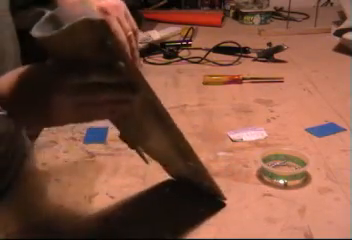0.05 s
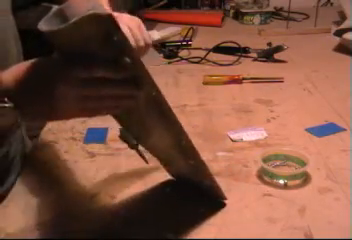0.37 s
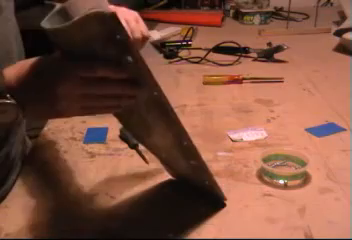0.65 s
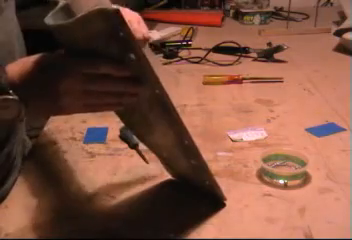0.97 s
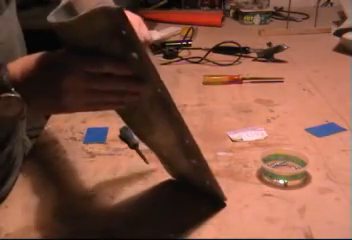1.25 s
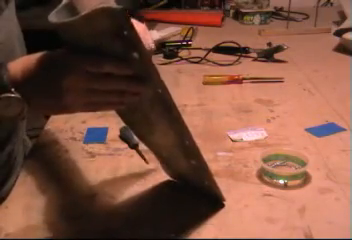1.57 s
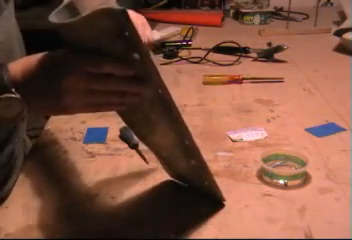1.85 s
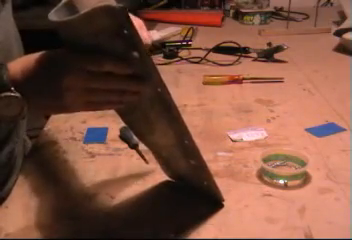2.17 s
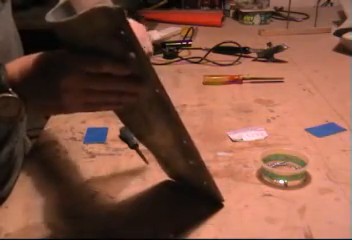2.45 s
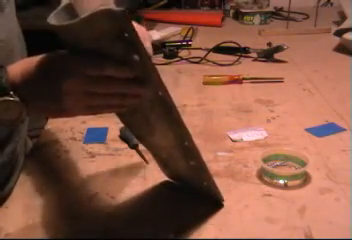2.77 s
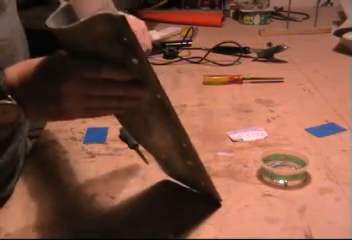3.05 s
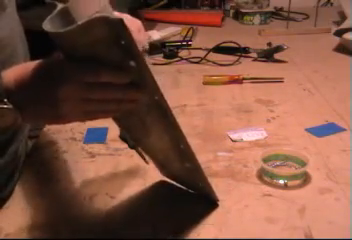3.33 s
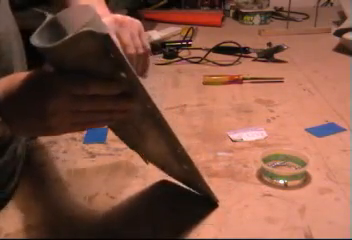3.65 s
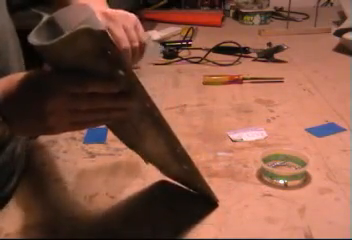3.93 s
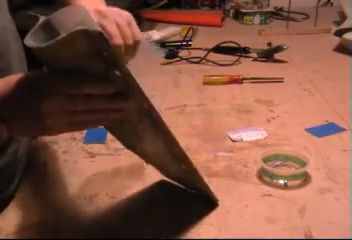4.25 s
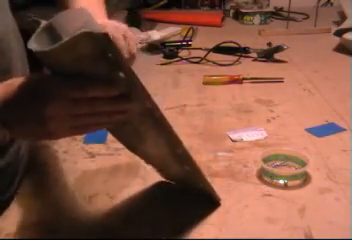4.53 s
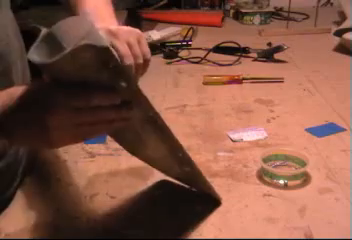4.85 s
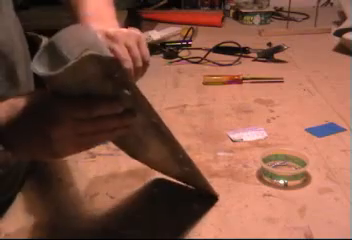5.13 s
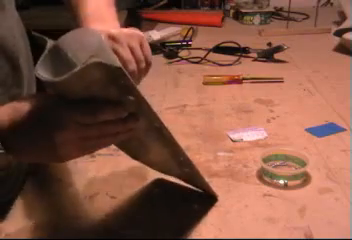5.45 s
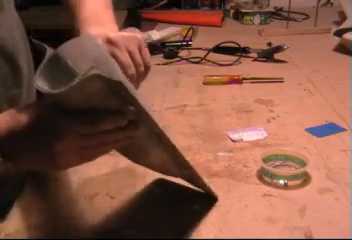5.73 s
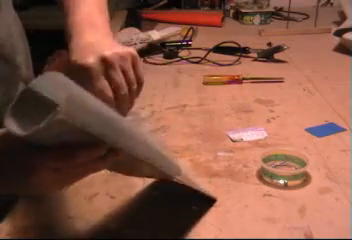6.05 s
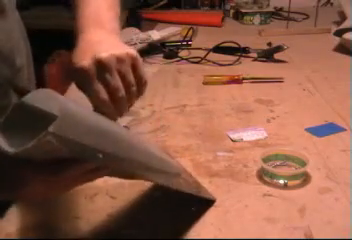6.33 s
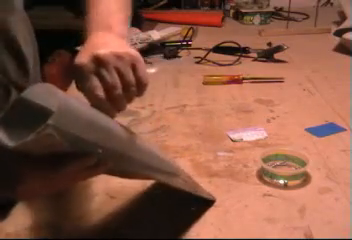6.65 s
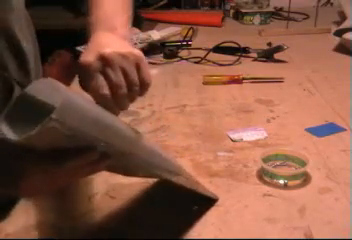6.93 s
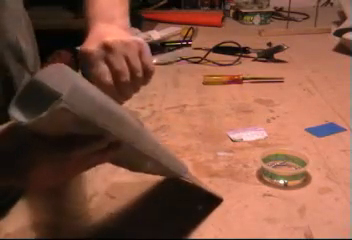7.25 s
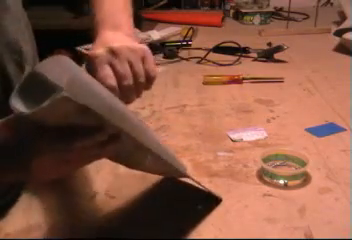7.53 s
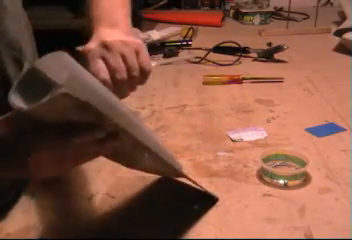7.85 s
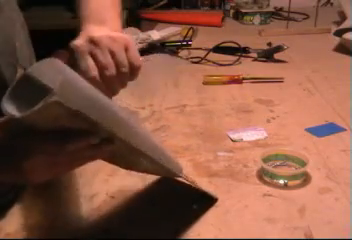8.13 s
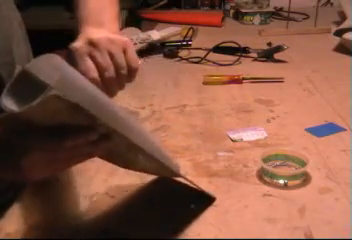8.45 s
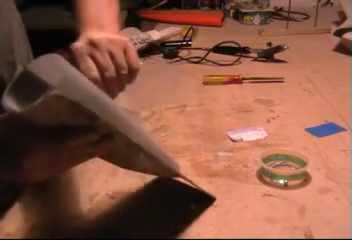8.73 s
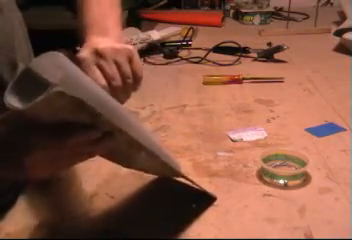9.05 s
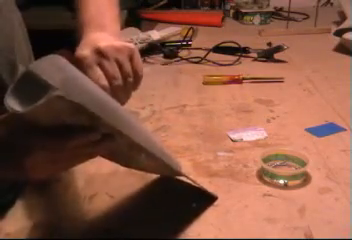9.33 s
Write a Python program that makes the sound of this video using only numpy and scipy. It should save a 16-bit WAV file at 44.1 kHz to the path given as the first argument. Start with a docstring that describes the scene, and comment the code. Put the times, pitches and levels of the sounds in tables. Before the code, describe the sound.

A thin plastic sheet is wiggled between a resin part and its hollow mould, rubbing and scraping in quick strokes with small squeaks. The resin lets go in scattered pops and dry cracks. Midway the mould knocks harder on the bench, followed by one very loud, sharp crack. Scraping and smaller crackles then carry on. The sound is close, in a small, quiet workshop.

```python
"""A small workshop: on the bench, a thin plastic sheet is worked to and fro between a resin part
and its mould. Each push flexes, rubs and scrapes the hollow shell; the sheet squeaks as it sticks
and rasps over the rim, and the mould knocks on the bench. The resin lets go in hollow pops and dry
cracks. A short room reverb and quiet room tone sit behind, and a limiter ducks the loudest peaks."""
import sys
import numpy as np
from scipy import signal
from scipy.fft import rfft, irfft, next_fast_len
from scipy.io import wavfile

SR = 44100
rng = np.random.default_rng(int(sys.argv[2]) if len(sys.argv) > 2 else 0)


def unload_audio(sound):
    """Save the sound as a 16-bit wav file, at the path given as the first command line argument."""
    columns = np.transpose(np.atleast_2d(sound))
    # keep every value between -1 and 1, then stretch to whole-number steps
    steps = np.round(np.clip(columns, -1, 1) * 32767)
    wavfile.write(sys.argv[1], SR, steps.astype(np.int16))


N = 414099

# Levels in the tables are relative; each layer adds its own gain.
# room tone: freq_hz, level_db
ROOM_TONE_EQ = [(25, -7), (60, -20), (120, -2.5), (200, -5.5), (320, -1), (550, -7), (800, -7.5),
                (1600, -11.5), (2700, -13.5), (3600, -22.5), (8000, -19.5), (13500, -29.5), (15500, -33)]
# the workshop's reverb time: freq_hz, t60_s
ROOM_DECAY = [(100, 0.52), (400, 0.32), (1200, 0.28), (4000, 0.245), (8000, 0.235), (15000, 0.21)]
# resonances of the hollow shell: pitch_hz, width_hz, lift_db
SHELL_MODES = [(114, 18, 5.5), (172, 16, 8), (210, 40, -4.5), (258, 30, 3), (308, 50, 7), (400, 30, 3),
               (550, 60, 5), (775, 45, 7), (856, 40, 5), (960, 50, 3), (1130, 90, 2), (1320, 90, 3),
               (1610, 200, 2.5), (2000, 110, 3), (2780, 110, 2), (3060, 90, 3), (3375, 70, 2.5),
               (3800, 70, 2.5), (4040, 90, 1)]

# the mould knocking on the bench: start_s, boom_db, knock_db, wall_pitch_hz
BENCH_KNOCKS = [(0.337, -45, -52, 296), (0.93, -60, -59, 300), (1.21, -52, -51, 300),
                (1.797, -53, -45, 301), (2.0, -41, -41, 290), (2.216, -48, -39.5, 258),
                (2.451, -40, -48, 290), (2.631, -52, -39.5, 258), (2.736, -58, -44, 339),
                (2.806, -41, -26, 172), (2.929, -44, -49, 300), (3.266, -57, -43, 300),
                (3.673, -62, -35.5, 306), (4.08, -34, -28, 220), (4.345, -29, -22, 387),
                (4.541, -31, -22, 305), (4.587, -27.5, -42, 166), (4.809, -19.5, -12.5, 382),
                (4.844, -27, -17.5, 166), (5.134, -31, -28.5, 177), (6.583, -59, -35, 312),
                (7.067, -43, -29.5, 312), (7.279, -46, -34, 296), (7.497, -61, -58, 300),
                (7.773, -60, -50, 290), (8.1, -46, -40.5, 284), (8.586, -33, -35.5, 392),
                (9.196, -54, -27.5, 296), (9.301, -32.5, -34, 274)]
# the bench's low boom and the mould's hollow knock: freq_hz, level_db
BOOM_EQ = [(25, -82), (60, -21), (90, -5), (120, 6), (160, -8.5), (220, -5), (450, -73.5)]
KNOCK_EQ = [(30, -42.5), (120, -15), (200, -5), (290, -7), (410, -5), (580, -12.5), (900, -19.5),
            (3000, -30), (10000, -39.5)]

# bouts of even wiggling: first_stroke_s, last_stroke_s, strokes_per_s, first_db, last_db
WIGGLE_BOUTS = [(0.793, 1.494, 7, -56.5, -55), (1.804, 2.343, 9, -58, -57), (2.65, 2.759, 9, -55, -52.5),
                (2.928, 3.368, 11, -47, -53), (4.988, 5.262, 7.5, -42.5, -51.5),
                (5.686, 5.917, 8, -52.5, -49), (6.45, 7.303, 7, -51, -56.5),
                (7.485, 7.813, 6.5, -48, -57.5), (7.952, 8.581, 6.5, -54, -48.5),
                (8.705, 9.312, 8, -49, -48)]
# single shoves and slow slides: middle_s, length_s, level_db
SINGLE_PUSHES = [(0.362, 0.057, -55), (0.635, 0.18, -62.5), (1.24, 0.0069, -72), (1.591, 0.032, -51.5),
                 (2.03, 0.039, -48), (2.133, 0.037, -49.5), (2.346, 0.019, -51), (2.45, 0.035, -40),
                 (2.543, 0.025, -46), (2.812, 0.02, -38.5), (3.022, 0.022, -37), (3.276, 0.048, -49),
                 (3.712, 0.11, -50), (3.915, 0.096, -61), (4.113, 0.046, -49), (4.255, 0.042, -47.5),
                 (4.356, 0.035, -41), (4.592, 0.06, -33.5), (4.863, 0.055, -34), (5.093, 0.029, -52),
                 (5.474, 0.15, -53), (6.143, 0.086, -53), (6.875, 0.045, -41), (7.037, 0.058, -48),
                 (7.085, 0.012, -44), (7.161, 0.053, -42.5), (7.634, 0.037, -48.5), (9.102, 0.015, -49)]
# flex and edge scrape against the rub, as the grip changes: time_s, flex_db, edge_db
GRIP_BALANCE = [(0.3, -6.5, -1.5), (1.2, 0.5, 1), (1.7, 7.5, 1), (2.5, 2.5, -1.5), (2.8, 1.5, -3.5),
                (3.05, 5, -2), (3.4, 6, 0), (3.7, -5.5, 0), (4.05, 10, 0), (4.6, -12, -1), (4.9, -4, -1),
                (5.15, -3, 0.5), (5.85, 2.5, 2), (6.2, -14.5, 0.5), (6.85, 0, -2.5), (7.35, 3, 1),
                (7.7, -7.5, 2.5), (8.5, -2.5, 1), (9.3, 2.5, -1)]
# the shell's low flex, the face's midrange rub and the edge's bright scrape: freq_hz, level_db
FLEX_EQ = [(25, -23), (60, -26), (90, -0.5), (120, 3), (165, -9), (215, 0), (290, -0.5), (420, -8),
           (600, -21), (1000, -46.5)]
RUB_EQ = [(350, 3.5), (620, 2.5), (800, 2.5), (1100, 1), (1550, 6), (2000, 0.5), (2600, 2), (3500, -12.5),
          (6000, -35)]
SCRAPE_EQ = [(1500, -29.5), (2600, -12), (4000, -10.5), (5700, -11), (8000, -13.5), (12000, -20.5),
             (14200, -27), (15500, -45.5)]
# groans and squeaks of the sticking sheet: middle_s, length_s, pitch_hz, level_db
SHEET_SQUEAKS = [(0.785, 0.0091, 1450, -51), (0.943, 0.03, 1460, -59.5), (1.22, 0.015, 1530, -57),
                 (1.356, 0.03, 1480, -55), (1.591, 0.019, 1530, -46), (2.952, 0.017, 530, -41.5),
                 (4.28, 0.1, 324, -60), (5.186, 0.11, 1320, -52), (6.11, 0.0048, 1950, -44),
                 (6.29, 0.0087, 1980, -53), (6.865, 0.035, 390, -41.5), (6.894, 0.05, 780, -54),
                 (7.16, 0.064, 795, -49), (7.282, 0.0099, 255, -34.5), (7.657, 0.058, 289, -45.5),
                 (7.948, 0.018, 1610, -58), (8.278, 0.017, 1520, -49), (8.37, 0.024, 610, -49.5)]
# the edge catching on the rim: middle_s, length_s, level_db, pitch_hz
RIM_RASPS = [(2.462, 0.0077, -32.5, 11800), (4.083, 0.0092, -49, 2980), (6.202, 0.022, -49, 1960),
             (7.081, 0.0076, -40.5, 9500), (7.63, 0.0095, -44, 2920), (7.675, 0.011, -44, 2600),
             (7.94, 0.013, -53, 1600), (8.285, 0.011, -44.5, 1570), (8.414, 0.0072, -45, 2550),
             (8.552, 0.022, -48, 2570), (8.675, 0.012, -41.5, 2500), (8.815, 0.0072, -40.5, 2030),
             (8.95, 0.0064, -46, 2530), (9.062, 0.017, -48, 1650), (9.275, 0.015, -42.5, 850)]
# the grit of a rasp: freq_hz, level_db
RASP_EQ = [(300, 4), (800, -13), (1600, 6), (2700, -1), (5000, -2.5), (10000, -6.5), (14000, -18),
           (15500, -45)]

# resin springing off the mould: start_s, level_db, patch_pitch_hz, tilt_db_per_octave, tick_db
RESIN_POPS = [(1.4209, -32.5, 930, -1.5, -8.5), (1.6562, -30.5, 960, -1, 0.5),
              (1.8667, -48, 940, -6.5, 0.5), (2.289, -44, 960, -3.5, -10), (2.437, -44.5, 1210, 3, 6),
              (2.4613, -34.5, 1210, 1, 3), (2.863, -32, 910, -1, -0.5), (4.1661, -32, 910, -1.5, -3.5),
              (4.4725, -52, 850, -1.5, 7.5), (4.6413, -30.5, 980, -1, -8), (4.6839, -29, 1500, 0.5, -5.5),
              (7.446, -44.5, 776, -8.5, -13), (8.999, -53.5, 1120, -6, -12)]
# resonances of the springing lip: pitch_hz, width_hz, level_db
LIP_MODES = [(320, 45, -1), (860, 100, 0), (1060, 230, -0.5), (1500, 100, -11), (1760, 140, -5),
             (2300, 160, -6), (2500, 200, 0), (3480, 240, -1), (4450, 260, -4)]
# the tick as the bond parts, and the pop as thrown around the room: freq_hz, level_db
TICK_EQ = [(2000, -50), (4800, -36), (5800, -25), (6900, -16.5), (8200, -22), (10000, -23), (13000, -32),
           (16000, -48)]
POP_SEND_EQ = [(100, -14), (340, -1), (600, -7.5), (880, 1.5), (1250, -4), (1750, -3.5), (2100, -4.5),
               (2800, -5.5), (4500, -8.5), (8000, -17)]

# dry cracks that also jolt the shell: start_s, level_db, patch_pitch_hz, tilt_db_per_octave
RESIN_CRACKS = [(0.0198, -59, 1540, -1), (0.3351, -51.5, 1250, -7), (2.0235, -48.5, 1550, -3),
                (2.787, -46.5, 1470, 1.5), (2.807, -38.5, 1550, -2.5), (3.0147, -36.5, 1420, -1.5),
                (3.1715, -42.5, 750, -1), (3.2624, -47, 1440, -2), (3.673, -47.5, 930, -1),
                (4.538, -27.5, 794, -1), (4.551, -26.5, 1060, -2.5), (5.4449, -9.5, 2940, -0.5),
                (5.6709, -49, 1346, -2), (5.7736, -60.5, 2490, 5), (5.821, -39, 2540, -2.5),
                (6.194, -47.5, 2080, -2), (6.3907, -39.5, 1690, -3.5), (6.582, -44.5, 9250, 1.5),
                (6.972, -64, 4000, 4), (7.0024, -41.5, 3100, -1), (7.0684, -45, 850, -1.5),
                (7.4314, -60, 2580, -1.5), (7.589, -65.5, 2570, 5), (8.06, -53, 1600, 0.5),
                (8.4107, -47.5, 2570, -2), (8.6416, -51, 2440, 0), (8.6767, -51.5, 754, -7),
                (8.7109, -32.5, 1270, 3), (8.913, -71, 5300, 8.5), (8.9462, -43, 2530, -1),
                (9.1562, -56, 4800, 1.5), (9.1949, -36.5, 1630, -1), (9.2793, -45, 840, -4.5)]
# a crack's basic tone, and the presence curve laid over it: freq_hz, level_db
SNAP_EQ = [(30, -36), (55, -23), (120, -26.5), (300, -2), (480, -13), (620, -11), (850, -6.5), (1400, -3.5),
           (3000, -14), (5000, -6), (9000, -2), (13000, -8), (16000, -34)]
PRESENCE_EQ = [(350, -4.5), (1100, -3), (1700, -1), (2900, 5), (4500, -2), (8500, -12.5)]
# the resin plate ringing on after a snap: pitch_hz, width_hz, level_db
PLATE_MODES = [(330, 200, 0), (950, 450, -1), (1550, 450, -4), (2500, 600, -3), (3500, 700, -5),
               (4500, 600, -8)]
# the stiff rim's resonances, which small cracks ring: pitch_hz, width_hz, lift_db
RIM_MODES = [(770, 70, 4), (1630, 150, 3.5), (2580, 300, 3), (4050, 200, 3), (5300, 200, 3)]
# the span over which pops and cracks tilt bright or dull: low_hz, high_hz
TILT_SPAN = (350, 8500)

# depth of the recorder's notch filter: freq_hz, share_cut
RECORDER_NOTCHES = [(380, 0), (580, .55), (2400, .45), (5000, .3), (9000, .1)]


def from_db(db):
    """Decibels to gain."""
    return 10 ** (np.asarray(db) / 20)


def rms_one(x):
    """Scale to rms 1."""
    return x / np.sqrt(np.mean(x ** 2) + 1e-20)


def at_hz(points, hz):
    """Read a curve along log frequency."""
    freqs, values = np.transpose(points)
    return np.interp(np.log(np.maximum(hz, 1)), np.log(freqs), values)


def add(track, start_s, sound):
    """Mix a sound into the track."""
    start = max(round(start_s * SR), 0)
    track[start:start + len(sound)] += sound[:N - start]


def drift(per_s):
    """A wandering random control signal with rms 1."""
    knots = rng.standard_normal(N // 20)
    return rms_one(np.interp(np.arange(N) / SR * per_s, np.arange(len(knots)), knots))


def eq(x, curve):
    """Minimum-phase EQ: nothing rings ahead of an attack."""
    size = 2 * next_fast_len(x.shape[-1] // 2 + 2048)
    log_gain = np.log(from_db(at_hz(curve, np.fft.rfftfreq(size, 1 / SR))))
    causal = np.r_[1, np.full(size // 2 - 1, 2), 1, np.zeros(size // 2 - 1)]
    response = np.exp(rfft(irfft(log_gain) * causal))
    return irfft(rfft(x, size) * response, size)[..., :x.shape[-1]]


def resonance(x, hz, width_hz):
    """A two-pole resonance with gain 1 at its peak."""
    r = np.exp(-np.pi * width_hz / SR)
    poles = [1, -2 * r * np.cos(2 * np.pi * hz / SR), r * r]
    return (1 - r * r) / 2 * signal.lfilter([1, 0, -1], poles, x + 1e-18)


def ring(x, modes):
    """Only the ringing of the modes that x excites."""
    return sum(from_db(db) * resonance(x, hz, width) for hz, width, db in modes)


def lift(x, modes, share=1):
    """Boost or dip x at each mode, by a share of its lift in dB."""
    return x + sum((from_db(share * db) - 1) * resonance(x, hz, width) for hz, width, db in modes)


def burst(t60_s, rise_s, size=6000):
    """A swelling, dying cluster of tiny contacts, even in spectrum, with unit energy."""
    t = np.arange(size) / SR
    fade = np.exp(-np.log(1000) * t / t60_s) * (1 - np.exp(-t / rise_s))
    x = rng.standard_normal(size) * fade
    for _ in range(2):  # flatten the spectrum, then restore the fade
        spectrum = rfft(x)
        x = irfft(spectrum / (np.abs(spectrum) + 1e-12)) * np.sqrt(fade)
    return x / np.sqrt(np.sum(x ** 2))


def friction(curve, slips_per_s, spread_db, hiss, judder_db, judder_per_s):
    """Tiny slips of uneven size over a smooth hiss; the contact grips and lets go."""
    sizes = from_db(spread_db * np.minimum(rng.exponential(1, N), 4)) * rng.choice([-1, 1], N)
    slips = rms_one(sizes * (rng.random(N) < slips_per_s / SR))
    texture = slips + hiss * rng.standard_normal(N)
    grip = from_db(judder_db * np.tanh(drift(judder_per_s)))
    return rms_one(eq(texture * grip, curve))


def push(t, middle_s, length_s):
    """The hand speeds up, then stops: a bell of friction power, length_s wide at half height."""
    return .5 ** np.minimum((2 * (t - middle_s) / length_s) ** 2, 60)


def stereo_noise(size, side):
    """Mid-side noise; more side makes it wider."""
    mid, difference = rng.standard_normal((2, size))
    return mid + side * difference * np.array([[1], [-1]])


def room_tone(level_db):
    """A wide, steady bed of soft air."""
    return from_db(level_db) * rms_one(eq(stereo_noise(N, side=0.97), ROOM_TONE_EQ))


def workshop_reverb(send, wet_db, side, build_s, size=22050):
    """Dense reflections build up and die away band by band; the bass stays narrow and close."""
    t, tail = np.arange(size) / SR, 0
    edges_hz = np.geomspace(60, 17000, 10)
    for low, high in zip(edges_hz, edges_hz[1:]):
        hz = np.sqrt(low * high)
        width = side * hz / (hz + 500) * (1 + (hz / 13000) ** 2)
        band = signal.butter(2, [low, high], "band", fs=SR, output="sos")
        noise = signal.sosfilt(band, stereo_noise(size, width))
        decay = from_db(-60 * t / at_hz(ROOM_DECAY, hz))
        tail += noise * decay * hz / (hz + 120)
    tail = rms_one(tail * (1 - np.exp(-t / build_s))) / np.sqrt(size)
    return from_db(wet_db) * signal.fftconvolve(send[None], tail, axes=1)[:, :N]


def bench_knocks(boom_gain_db, knock_gain_db, wall_lift_db, wall_width_hz):
    """The mould shifts: the bench booms under a short, hollow knock that rings one note of the wall."""
    out = np.zeros(N)
    for start_s, boom_db, knock_db, wall_hz in BENCH_KNOCKS:
        boom = eq(burst(t60_s=0.05, rise_s=0.0048), BOOM_EQ)
        knock = eq(burst(t60_s=0.066, rise_s=0.0018), KNOCK_EQ)
        knock = lift(knock, [(wall_hz, wall_width_hz, wall_lift_db)])
        add(out, start_s, from_db(boom_db + boom_gain_db) * boom)
        add(out, start_s, from_db(knock_db + knock_gain_db) * knock)
    return out


def squeaks(q):
    """Stick and slip feeds one resonance for a moment, giving a rough, wavering note."""
    t, out = np.arange(N) / SR, 0
    for middle_s, length_s, hz, level_db in SHEET_SQUEAKS:
        band = resonance(rng.standard_normal(N), hz, hz / q)
        note = rms_one(resonance(band, hz, hz / q))
        out += from_db(level_db) * np.sqrt(push(t, middle_s, length_s)) * note
    return out


def rim_rasps(lift_db, q):
    """Quick runs of fine slips, each ringing its own spot of the rim."""
    t, out = np.arange(N) / SR, 0
    grit = friction(RASP_EQ, slips_per_s=5000, spread_db=2.5, hiss=.4, judder_db=2, judder_per_s=400)
    for middle_s, length_s, level_db, hz in RIM_RASPS:
        rasp = rms_one(lift(grit, [(hz, hz / q, lift_db)]))
        out += from_db(level_db) * np.sqrt(push(t, middle_s, length_s)) * rasp
    return out


def wiggles(stroke_s):
    """Even strokes at the hand's pace, their force ramping over a bout: middle_s, length_s, level_db."""
    strokes = []
    for first_s, last_s, per_s, first_db, last_db in WIGGLE_BOUTS:
        count = 1 + round((last_s - first_s) * per_s)
        ramp = np.linspace((first_s, first_db), (last_s, last_db), count)
        strokes += [(middle_s, stroke_s, level_db) for middle_s, level_db in ramp]
    return strokes


def wandering_contact(x, modes, swell_db, per_s):
    """The point of contact wanders, so the shell's resonances swell and fade by turns."""
    moving_modes = [(hz, width, swell_db * np.tanh(drift(per_s))) for hz, width, _ in modes]
    return rms_one(lift(x, moving_modes))


def sheet_strokes(flex_gain_db, rub_gain_db, edge_gain_db):
    """One push drives three layers: the shell flexes, the sheet's face rubs and its edge scrapes."""
    t, power = np.arange(0, N, 40) / SR, 0
    usual_db, edge_growth = -52, 0.87  # the scrape grows more slowly with force than the rub
    grip_s, *grip_columns = np.transpose(GRIP_BALANCE)
    for middle_s, length_s, level_db in wiggles(stroke_s=0.046) + SINGLE_PUSHES:
        flex_db, bite_db = [np.interp(middle_s, grip_s, column) for column in grip_columns]
        edge_db = usual_db + bite_db + edge_growth * (level_db - usual_db)
        gains = from_db([[level_db + flex_db], [level_db], [edge_db]])
        power += gains ** 2 * push(t, middle_s, length_s)
    flex_env, rub_env, edge_env = [np.interp(np.arange(N) / SR, t, np.sqrt(p)) for p in power]
    flex = friction(FLEX_EQ, slips_per_s=400, spread_db=1.5, hiss=.7, judder_db=2, judder_per_s=50)
    rub = friction(RUB_EQ, slips_per_s=1800, spread_db=2.5, hiss=.45, judder_db=3, judder_per_s=200)
    edge = friction(SCRAPE_EQ, slips_per_s=2500, spread_db=3.3, hiss=.45, judder_db=3, judder_per_s=200)
    flex = wandering_contact(flex, SHELL_MODES[:7], swell_db=3.5, per_s=8.2)
    rub = wandering_contact(rub, SHELL_MODES[7:15], swell_db=5, per_s=12)
    return (from_db(flex_gain_db) * flex_env * flex
            + from_db(rub_gain_db) * rub_env * rub
            + from_db(edge_gain_db) * edge_env * edge)


def resin_pops(gain_db, patch_lift_db, patch_q, tick_send_db):
    """One clean jolt rings the lip under a bright tick. Returns the direct pop and a duller room send."""
    direct, send = np.zeros((2, N))
    soft_contact = signal.butter(2, 2900, fs=SR, output="sos")
    jolt = signal.sosfilt(soft_contact, signal.unit_impulse(6000))
    for start_s, level_db, patch_hz, tilt, tick_db in RESIN_POPS:
        kick = eq(jolt, [(hz, tilt * np.log2(hz / patch_hz)) for hz in TILT_SPAN])
        kick = lift(kick, [(patch_hz, patch_hz / patch_q, patch_lift_db)])
        tick = from_db(tick_db) * eq(burst(t60_s=0.0077, rise_s=0.0003), TICK_EQ)
        gain = from_db(gain_db + level_db)
        add(direct, start_s, gain * (ring(kick, LIP_MODES) + tick))
        add(send, start_s, gain * (eq(kick, POP_SEND_EQ) + from_db(tick_send_db) * tick))
    return direct, send


def resin_cracks(gain_db, plate_db, patch_lift_db, patch_q, send_db):
    """A snap rings the plate and the freed patch adds its pitch. Returns direct sound and room send."""
    direct, send = np.zeros((2, N))
    lowpass, highpass = [signal.butter(2, 5000, kind, fs=SR, output="sos") for kind in ("low", "high")]
    hz, pivot_hz = np.geomspace(30, 16000, 60), 1800
    octaves = np.log2(np.clip(hz, *TILT_SPAN) / pivot_hz)
    for start_s, level_db, patch_hz, tilt in RESIN_CRACKS:
        run = 1 + 2.4 * from_db(level_db)  # a stronger crack runs further
        body = signal.sosfilt(lowpass, burst(t60_s=0.011 * run, rise_s=0.0026 * run))
        tip = signal.sosfilt(highpass, burst(t60_s=0.012 * run, rise_s=0.00064 * run))
        plate = ring(burst(t60_s=0.04, rise_s=0.00016), PLATE_MODES)
        tone = np.c_[hz, at_hz(SNAP_EQ, hz) + at_hz(PRESENCE_EQ, hz) + tilt * octaves]
        patch = [(patch_hz, patch_hz * run ** 2 / patch_q, patch_lift_db)]  # long cracks ring less purely
        snap = lift(eq(body + tip + from_db(plate_db) * plate, tone), patch)
        thrown = lift(eq(burst(t60_s=0.011, rise_s=0.00056), tone), patch)
        gain = from_db(gain_db + level_db)
        add(direct, start_s, gain * lift(snap, RIM_MODES, share=1 / run ** 3))
        add(send, start_s, gain * from_db(send_db) * thrown)
    return direct, send


def scene():
    """Strokes, knocks and cracks sound through the shell; squeaks and pops join them in the room."""
    strokes = sheet_strokes(flex_gain_db=-0.5, rub_gain_db=-2, edge_gain_db=-4)
    rasps = rim_rasps(lift_db=6.5, q=9.7)
    pops, pop_send = resin_pops(gain_db=46, patch_lift_db=3.5, patch_q=3.3, tick_send_db=-2.5)
    cracks, crack_send = resin_cracks(gain_db=45, plate_db=-2, patch_lift_db=6.5, patch_q=7.2,
                                      send_db=1.5)
    knocks = bench_knocks(boom_gain_db=48, knock_gain_db=40.5, wall_lift_db=9.5, wall_width_hz=43)
    handling = lift(strokes + rasps + knocks, SHELL_MODES) + squeaks(q=3.7)
    direct = handling + lift(cracks, SHELL_MODES) + pops
    send = handling + lift(crack_send, SHELL_MODES[:10], share=0.8) + pop_send
    return room_tone(level_db=-56.5) + workshop_reverb(send, wet_db=-3, side=0.4, build_s=0.002) + direct


def notch_comb(x, spacing_hz):
    """Evenly spaced narrow notches hollow the mids slightly."""
    size = next_fast_len(N + 4096)
    hz = np.fft.rfftfreq(size, 1 / SR)
    delay = np.exp(-2j * np.pi * hz / spacing_hz)
    comb = delay / (2 - delay)  # 1 at every multiple of the spacing
    return irfft(rfft(x, size) * (1 - at_hz(RECORDER_NOTCHES, hz) * comb), size)[:, :N]


def limiter(x, threshold_db, release_db_per_s, attack_s):
    """The gain ducks quickly under a loud peak and recovers steadily."""
    over_db = np.maximum(20 * np.log10(np.abs(x).max(axis=0) + 1e-9) - threshold_db, 0)
    release = release_db_per_s * np.arange(N) / SR
    duck_db = np.maximum.accumulate(over_db + release) - release
    r = np.exp(-1 / (attack_s * SR))
    return x * from_db(-signal.lfilter([1 - r], [1, -r], duck_db))


def record(dry):
    """Narrow notches hollow the mids; then low cut, limiter, soft clipping and a steep top cut."""
    low_cut = signal.butter(2, 26, "high", fs=SR, output="sos")
    top_cut = signal.ellip(10, .2, 80, 15900, fs=SR, output="sos")
    heard = signal.sosfilt(low_cut, notch_comb(dry, spacing_hz=301))
    held = limiter(heard, threshold_db=-0.5, release_db_per_s=105, attack_s=0.0011)
    rounded = .53 * np.tanh(held / .53)
    return signal.sosfilt(top_cut, rounded)


dry = scene()
out = record(dry)
unload_audio(out)
```